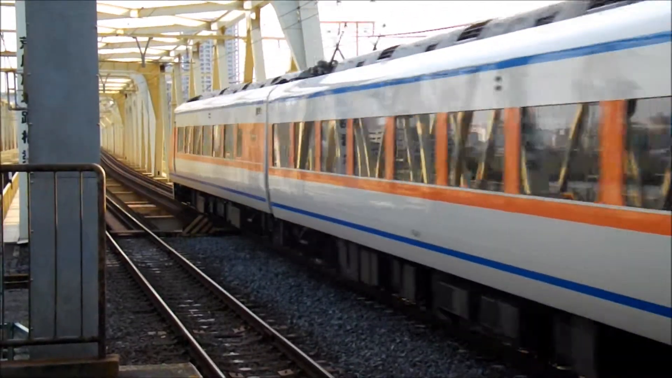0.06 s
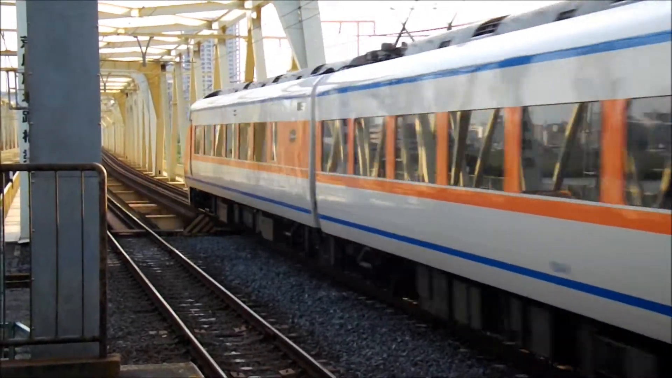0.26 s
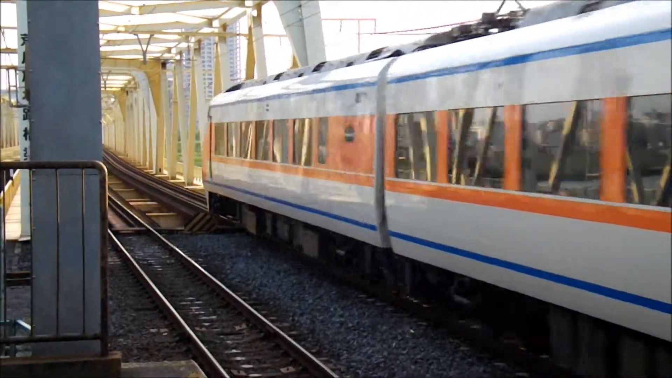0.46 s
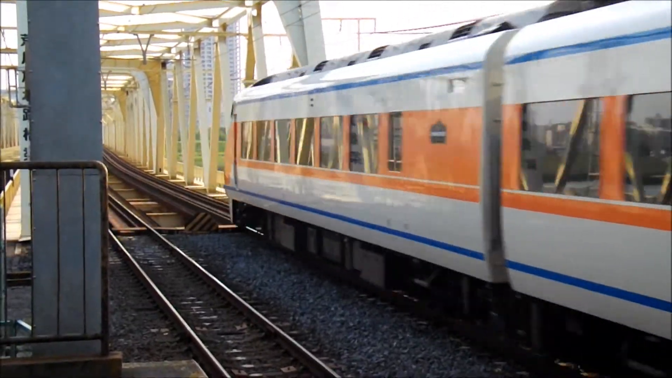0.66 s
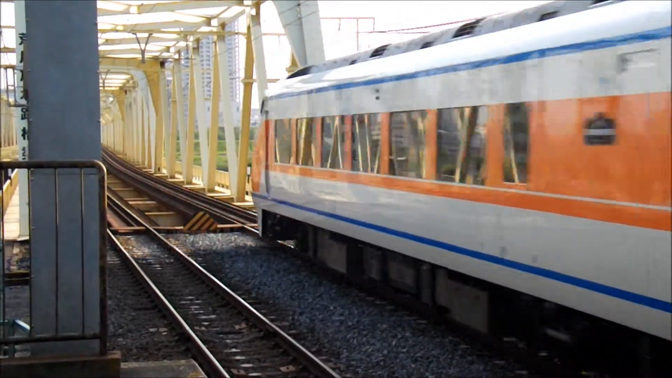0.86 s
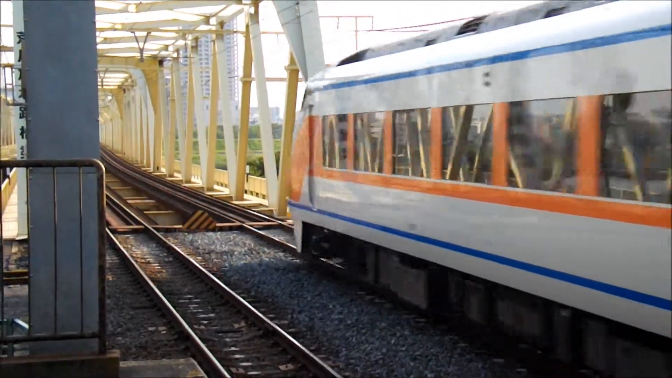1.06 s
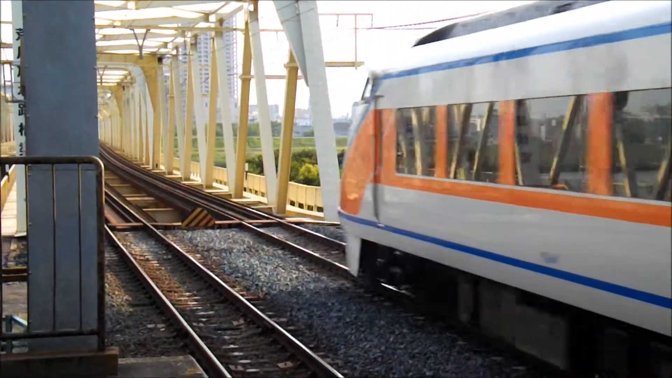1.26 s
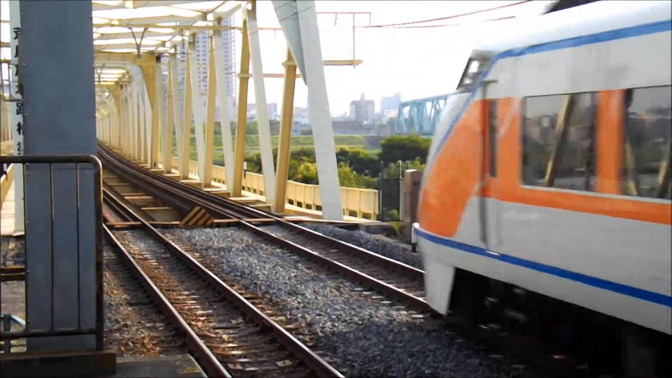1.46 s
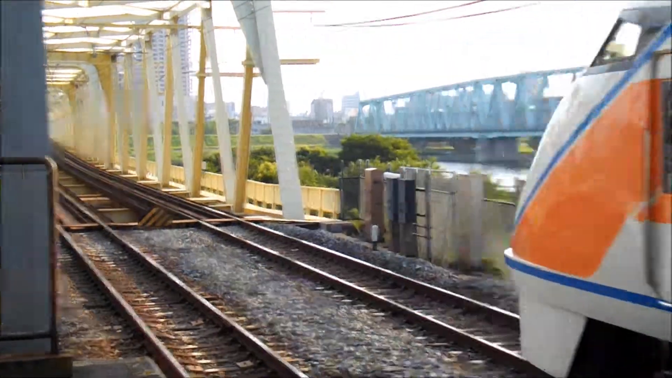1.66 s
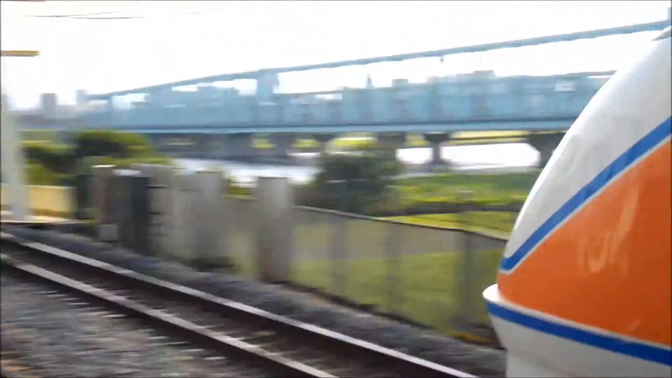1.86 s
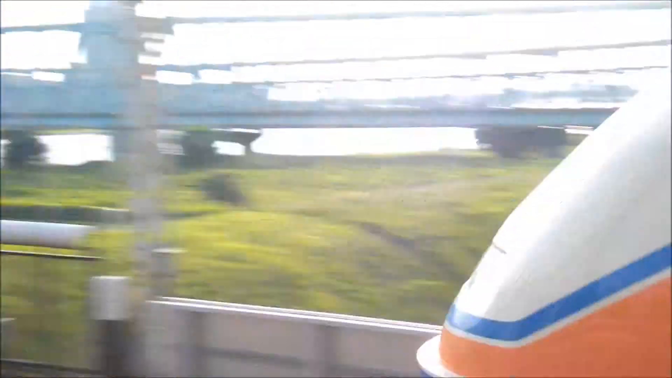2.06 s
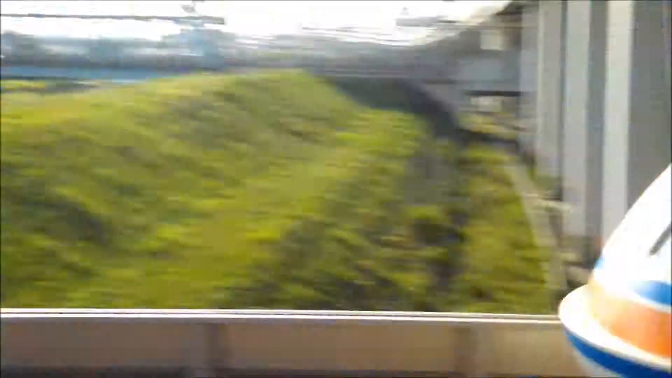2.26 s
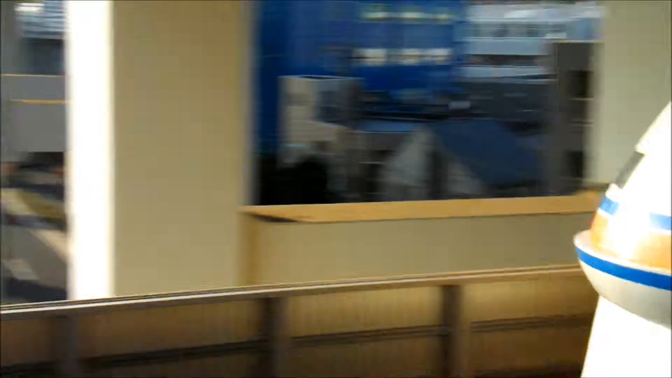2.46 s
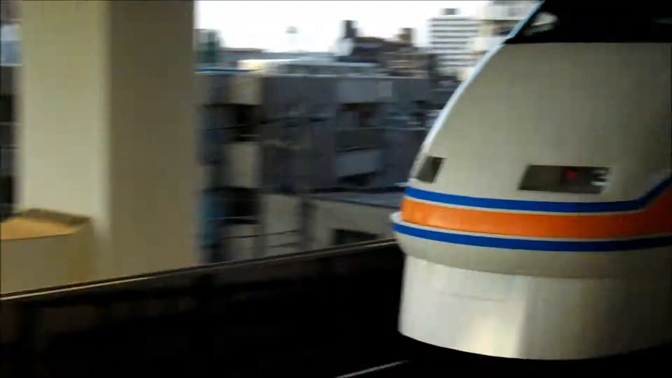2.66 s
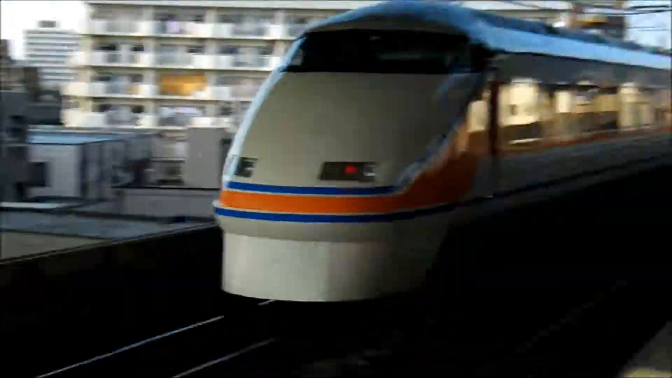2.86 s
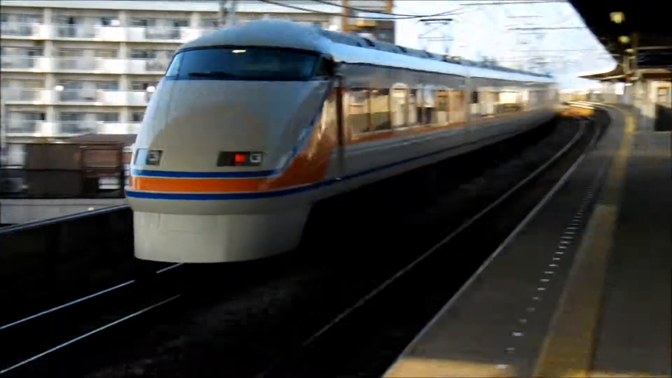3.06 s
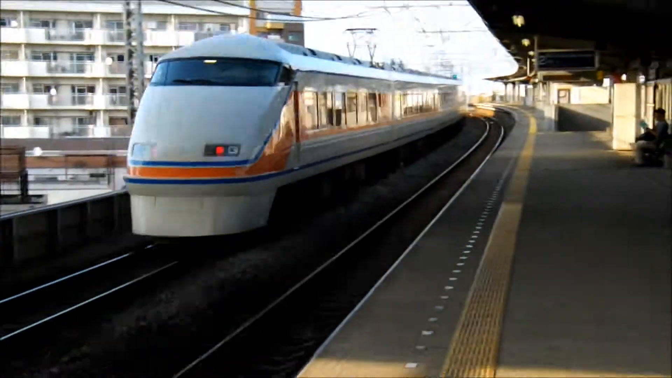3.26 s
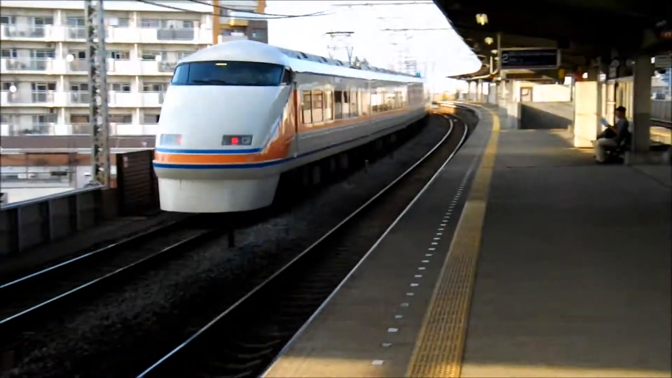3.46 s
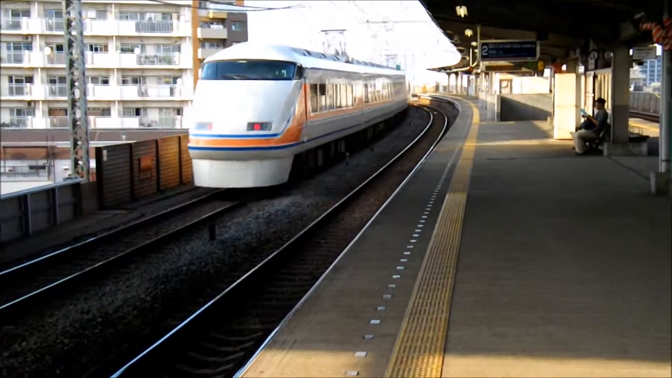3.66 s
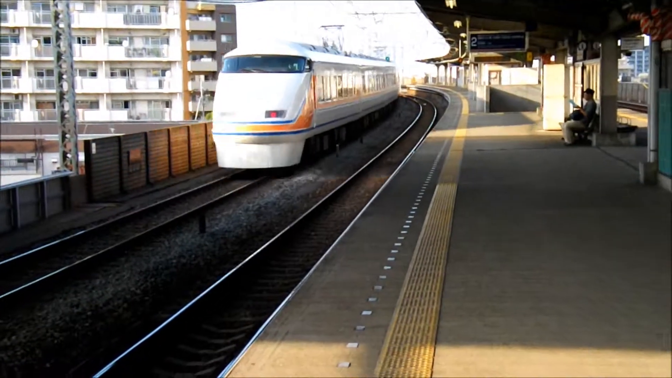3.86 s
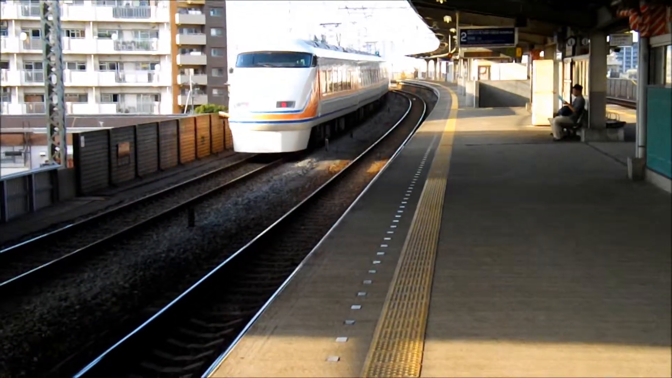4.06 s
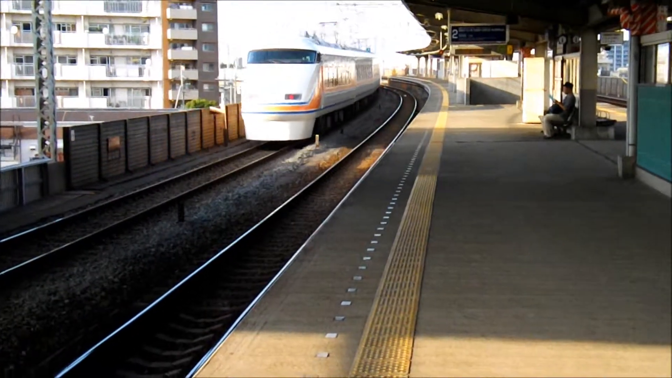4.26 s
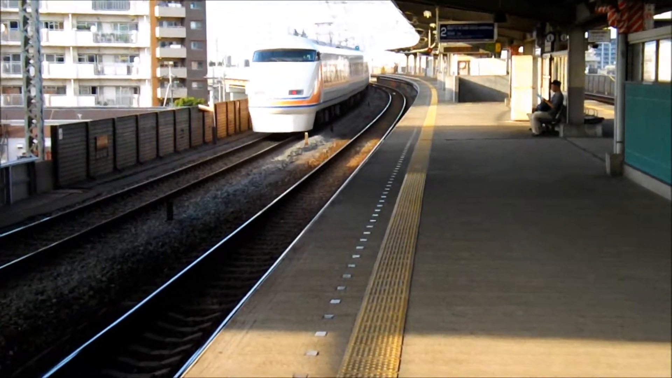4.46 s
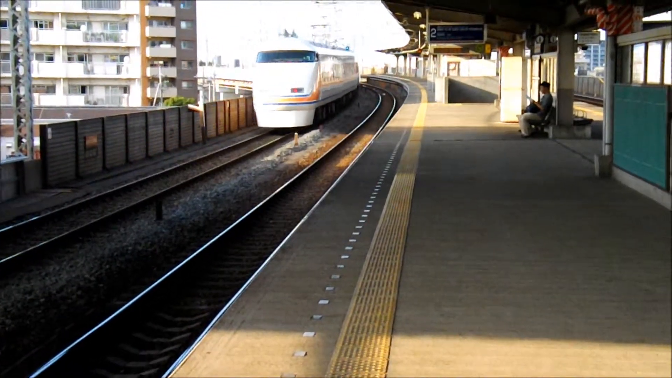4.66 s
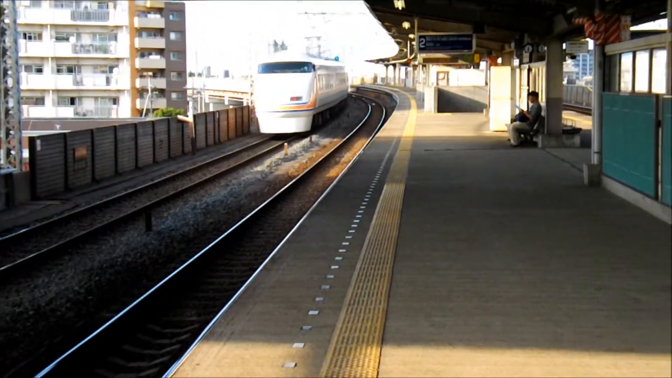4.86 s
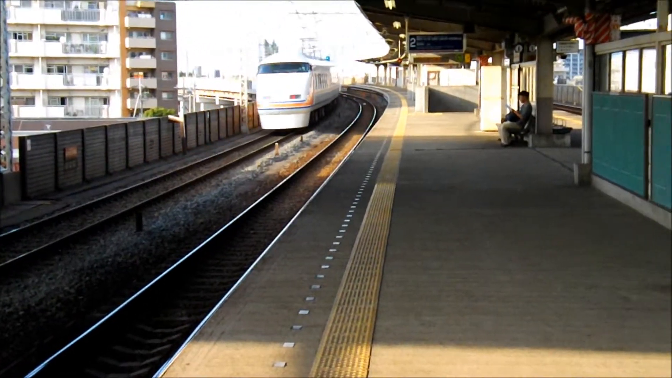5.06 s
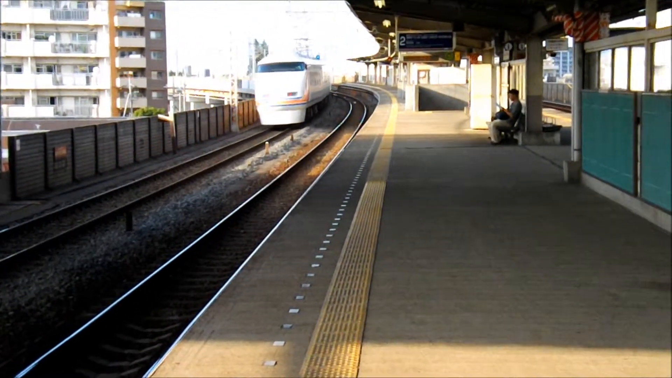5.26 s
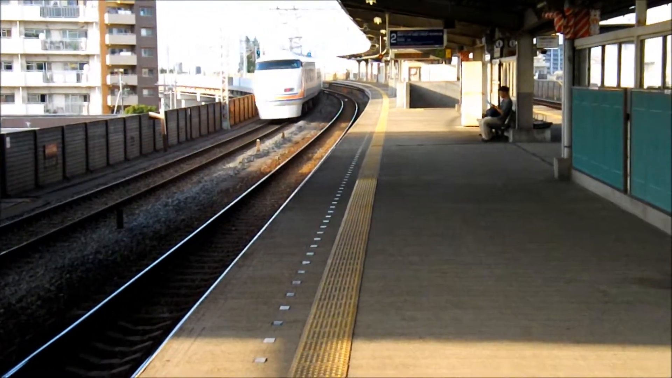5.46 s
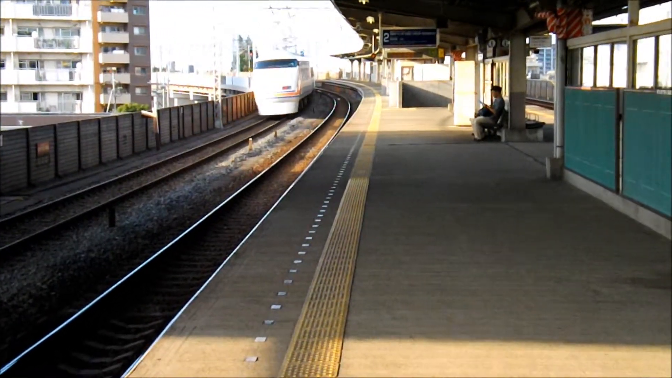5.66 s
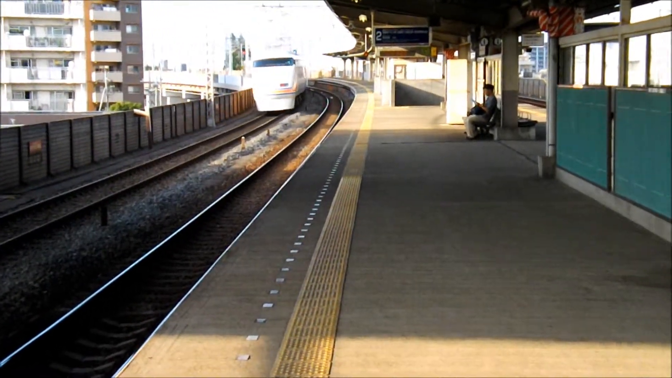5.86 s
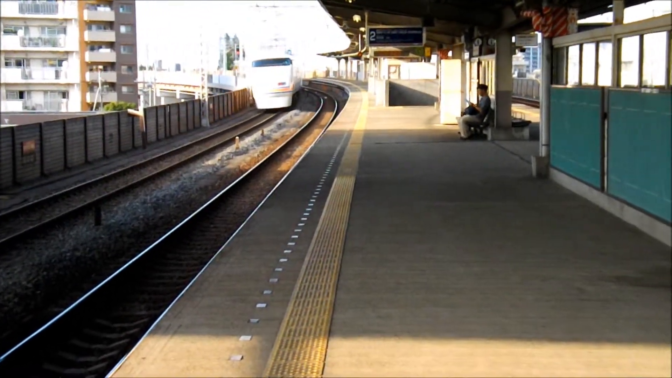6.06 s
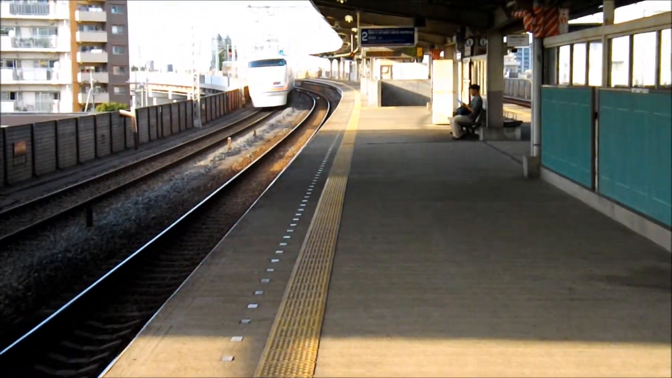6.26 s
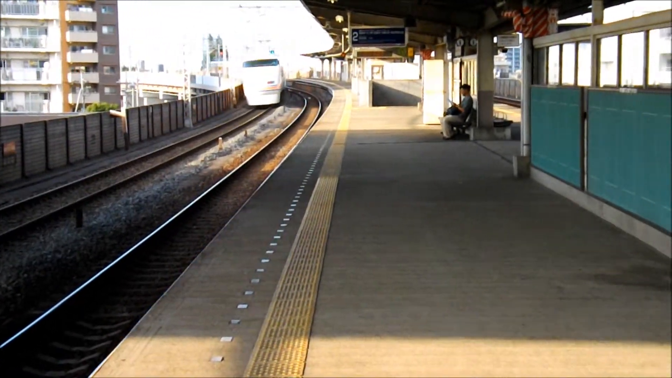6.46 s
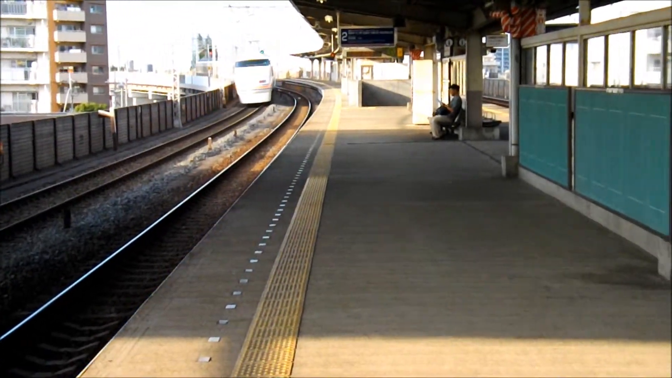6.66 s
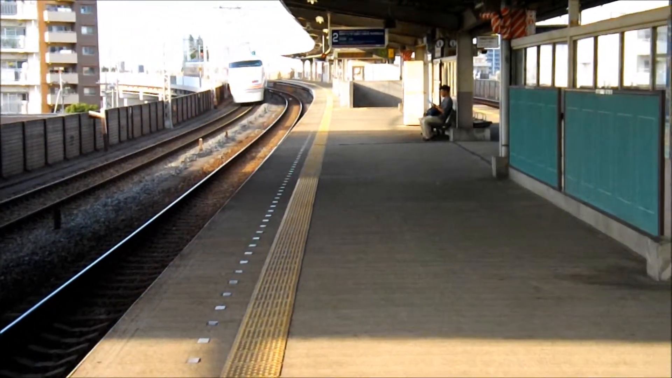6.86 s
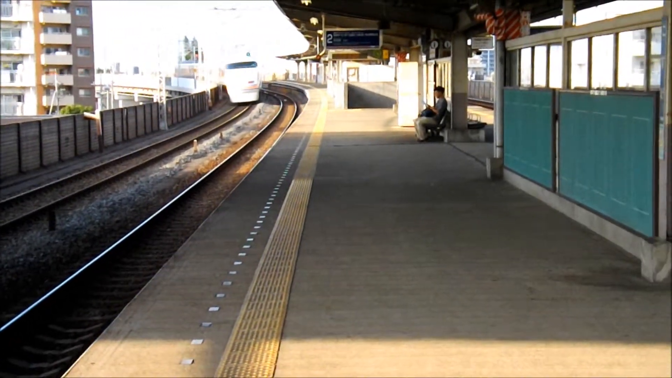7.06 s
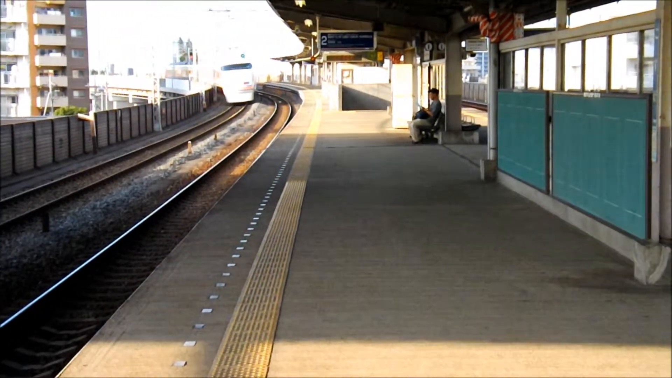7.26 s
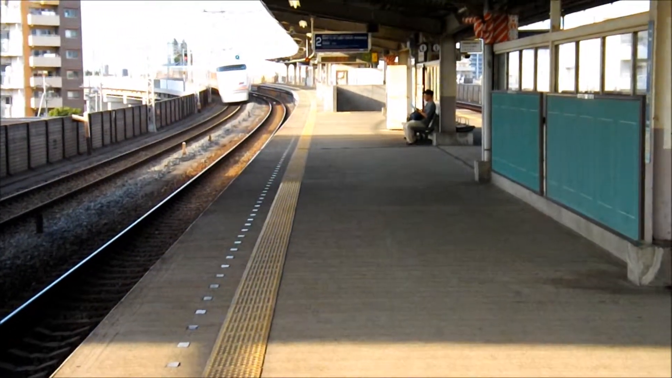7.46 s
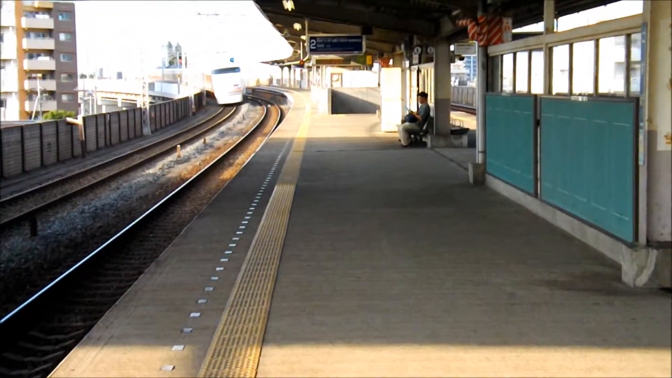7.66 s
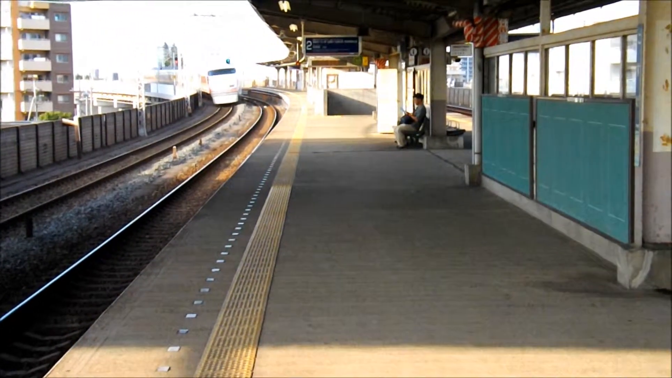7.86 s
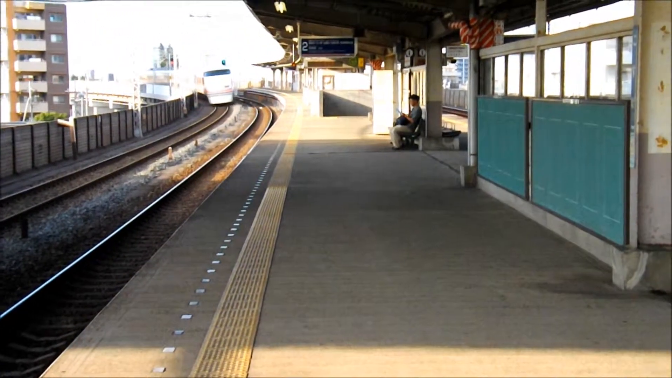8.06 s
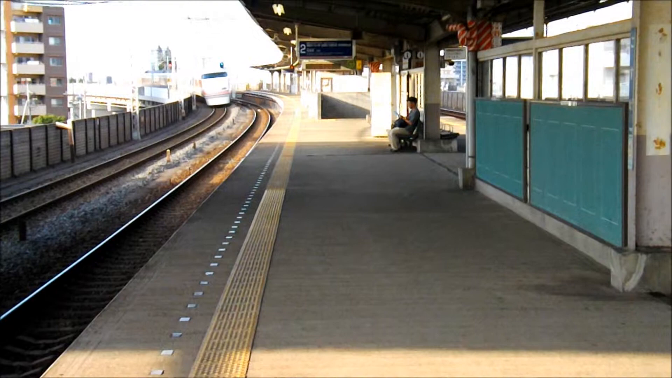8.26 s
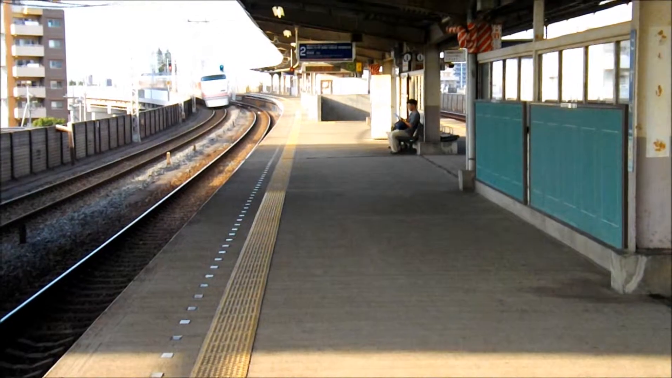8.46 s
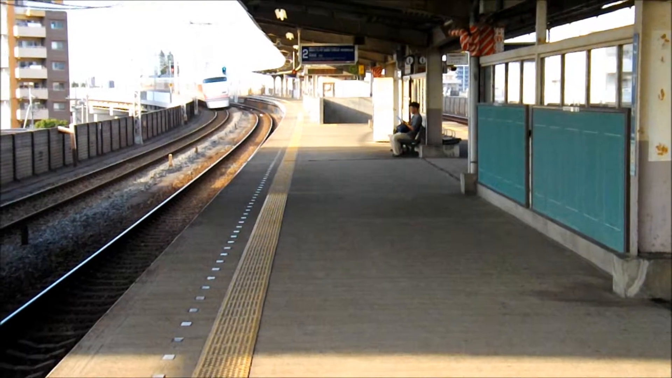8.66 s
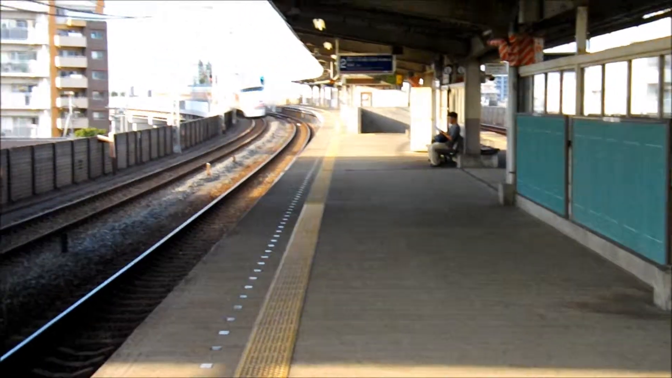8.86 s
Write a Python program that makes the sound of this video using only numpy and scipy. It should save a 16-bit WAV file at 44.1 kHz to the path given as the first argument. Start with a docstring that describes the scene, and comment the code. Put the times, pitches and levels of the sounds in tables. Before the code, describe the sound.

Loud rattling rush of a fast train close by, with wavering motor whine and brief wheel squeals, fading to thin rail hiss and buffeting air.

```python
"""A station platform beside a steel truss bridge: an electric express rushes past and recedes.
Bridge and track roar and wheels hiss on rails (shaped noise), while their flanges sing in brief narrow bands.
The drive whines in wavering tones, and the rails go on hissing behind the train.
Its slipstream then buffets the microphone in short, fluttering puffs of noise; a town murmurs throughout."""
import sys
import numpy as np
from scipy import signal
from scipy.fft import rfft, irfft, next_fast_len
from scipy.io import wavfile
from scipy.ndimage import uniform_filter1d, map_coordinates

SR = 44100
rng = np.random.default_rng(int(sys.argv[2]) if len(sys.argv) > 2 else 0)


def master(y):
    """Save y as 16-bit WAV."""
    cut = np.clip(np.atleast_2d(y).T, -1, 1)
    pcm = np.round(cut * 32767)  # scale
    wavfile.write(sys.argv[1], SR, pcm.astype(np.int16))


N = 393372

# The pass: constant distance until the last wheels leave, then a straight retreat
TRACK_M, SPEED_M_PER_S, LAST_WHEELS_S = 12, 20, 2.12

# Rolling sounds, before each layer's trim: [start level/dB, sag alongside/(dB/s),
# loss per tenfold distance/dB, level that the rails carry from afar/dB]
ROAR_FADE = (-23.5, 0.68, 29, -43.5)
RUSH_FADE = (-21, 1.04, 29, -49)
HISS_FADE = (-24, 1.2, 18.5, -48.5)

# Swells as wheels bear harder on the rail: [middle t/s, half length/s, hiss level before trim/dB]
WHEEL_SWELLS = [(0, 0.13, -22.5), (.5, 0.2, -24.5), (.78, 0.056, -26.5), (1.0, 0.07, -25),
                (1.89, 0.046, -19), (2.5, 0.027, -25), (2.75, 0.11, -22.5), (4.1, 0.071, -40),
                (4.8, 0.041, -39.5), (5.85, 0.036, -45), (7.74, .035, -41), (8.38, 0.1, -41),
                (8.62, 0.028, -39.5), (8.88, 0.13, -40.5)]
SWELL_RUSH_DB = -5.5  # a swell's gain in the rush relative to the hiss, before their trims

# Relative spectra of the rolling noise: [f/Hz, level/dB]
ROAR_SPECTRUM = [(25, -37), (60, -22), (110, -19), (150, -12.5), (185, -7), (270, -3), (370, -2), (480, 1),
                 (620, 3), (900, -1), (1300, -6), (2000, -8), (4000, -58)]
RUSH_SPECTRUM = [(400, -47), (900, -4.5), (1400, -5), (2000, -2), (3000, 0), (3900, 2), (4700, -0.5),
                 (5400, -7.5), (6200, -15), (7000, -16.5), (8200, -21.5), (10000, -32.5), (12000, -45.5),
                 (16000, -75)]
RAIL_HISS_SPECTRUM = [(2500, -31), (3600, -23), (4150, 0.5), (4900, 1.5), (5250, -1.5), (5600, -10),
                      (6100, -22), (7500, -22), (11000, -56)]

# Resonances of girders and rails: [f/Hz, width/Hz, lift/dB]
TRACK_MODES = [(194, 40, 4.5), (356, 80, 3.5), (795, 110, 3.5), (1102, 130, 3.5)]
RAIL_MODES = [(1600, 91, 0.76), (2330, 330, 2.1), (3200, 110, 0.33)]

# Whine of the drive: [t/s, central f/Hz, level before the line levels/dB]
DRIVE_COURSE = [(0, 823.7, -36), (1, 794, -42), (1.8, 765, -36), (2.6, 742, -37), (3.2, 731, -42),
                (3.8, 716, -46.5), (4.6, 713, -43), (5, 713, -55), (8.92, 712, -57)]
# Lines of the whine: [multiple of the central f, relative level/dB]
DRIVE_LINES = [(1, -1.5), (1.572, -8), (2.061, -10.5), (3.2, -7)]
# Depth of pitch wander as a share of f: always present, and added alongside
FAR_SPREAD, NEAR_SPREAD = 0.003, 0.046

# Relative spectrum of the town: [f/Hz, level/dB]
TOWN_SPECTRUM = [(25, -13), (60, 1.5), (110, 4.5), (250, 1), (500, -9), (850, 2), (1500, 0), (2250, -4.5),
                 (3000, -26), (7000, -36)]

# Wheels scraping and ringing: [middle t/s, half length/s, f/Hz, width/Hz, level/dB]
FLANGE_NOTES = [(0.028, 0.039, 5290, 220, -23), (.44, .025, 3900, 400, -21),
                (0.756, 0.055, 6800, 1600, -30.5), (0.98, 0.013, 1680, 54, -23.5),
                (1.004, 0.03, 4100, 200, -22.5), (1.272, 0.037, 765, 50, -22),
                (1.862, 0.065, 5200, 150, -27), (2.608, 0.025, 5360, 340, -19), (3.35, 0.074, 617, 22, -41)]

# Brief dips of the train's level: [t/s, nominal depth/dB, recovery/s]
LEVEL_DIPS = [(.06, 7, .017), (.303, 6, 0.016), (.356, 8, .012), (.676, 6.5, .02), (.709, 7, 0.0081),
              (.742, 5.5, 0.03), (.882, 5.5, 0.025), (.941, 9, 0.02), (1.128, 12.5, .027),
              (1.176, 3.5, 0.048), (1.42, 5.5, 0.013), (1.761, 7, 0.0092), (1.955, 3.5, 0.024),
              (2.039, 8.5, 0.0091), (2.307, 7, 0.023), (2.398, 6, 0.013), (2.64, 4, 0.02)]
DIP_FALL_S = 0.003

# The slipstream arrives behind the train and leaves a light breeze (level before trim)
WAKE_S, WAKE_RISE_S, BREEZE_DB = 3.7, 0.2, -52
# Gusts in it: [middle t/s, half length/s, level before trim/dB]
GUSTS = [(3.96, 0.18, -33.5), (4.24, 0.11, -31), (4.56, 0.14, -37.5), (4.86, 0.036, -36),
         (5.23, 0.023, -42), (5.53, 0.097, -40), (5.82, .08, -39), (6.15, 0.15, -35.5),
         (6.54, 0.054, -39.5), (7.0, 0.1, -40.5), (7.6, 0.28, -39), (7.94, .1, -41), (8.37, 0.11, -35.5),
         (8.76, 0.11, -43.5)]
# Strongest single puffs of air: [t/s, level before a common cut/dB]
PUFFS = [(3.902, -16), (3.932, -19), (4.069, -17), (4.18, -13.5), (4.223, -12.5), (4.255, -12),
         (4.266, -13), (4.298, -17), (4.323, -17), (4.788, -20.5), (4.875, -23), (5.451, -17), (5.488, -20),
         (5.514, -22), (5.787, -19), (5.89, -21), (6.002, -21.5), (6.141, -21.5), (6.214, -22.5),
         (6.269, -20.5), (6.999, -25), (7.059, -26.5), (7.319, -26), (7.458, -22.5), (7.526, -23.5),
         (8.244, -21), (8.443, -20)]
PUFF_RISE_S, PUFF_LENGTH_S = 0.0014, 0.013

# Relative spectra of the moving air: [f/Hz, level/dB]
BUFFET_SPECTRUM = [(25, -27), (60, -16), (110, -3.5), (220, -0.5), (380, -0.5), (650, -8.5), (900, -18),
                   (1300, -23), (2500, -34), (14000, -68)]
PUFF_SPECTRUM = [(40, -26), (120, -15.5), (300, 2), (600, 0), (850, -6), (1300, -20), (2500, -29),
                 (14000, -62)]

# Relative spectrum of the electronics: [f/Hz, level/dB]
MIC_HISS_SPECTRUM = [(30, 10), (5000, -12), (9000, 4.5), (13000, 2.5), (16000, -1.5)]
TOP_HZ = 15750  # nothing passes from here up


def amp(db):
    """Logarithmic level: decibels become an amplitude ratio."""
    return 10 ** (np.asarray(db) / 20)


def unit(x):
    """Normalisation: scale to rms 1."""
    return x / np.sqrt(np.mean(x ** 2) + 1e-20)


def clock():
    """Sampling: the time of each sample in seconds."""
    return np.arange(N) / SR


def curves(rows):
    """Linear interpolation: one value per sample for each column after the time."""
    s, *columns = np.transpose(rows)
    return [np.interp(clock(), s, column) for column in columns]


def wobble(rate):
    """Band-limited fluctuation: a smooth random curve with rate knots a second."""
    knots = rng.standard_normal(int(N * rate / SR) + 4)
    return map_coordinates(knots, [clock() * rate])


def filtered(x, response):
    """Linear filtering: multiply the spectrum of x by a response of frequency."""
    n = x.shape[-1]
    padded = next_fast_len(n + SR // 10)
    spectrum = rfft(x, padded) * response(np.fft.rfftfreq(padded, 1 / SR))
    return irfft(spectrum, padded)[..., :n]


def coloured(x, spectrum, modes=()):
    """Spectral shaping with resonance: weight x by a spectrum and modal humps, at rms 1."""
    f, db = np.transpose(spectrum)

    def response(hz):
        level_db = np.interp(np.log(hz + 1), np.log(f), db)
        for centre, width, lift in modes:
            level_db = level_db + lift / (1 + (2 * (hz - centre) / width) ** 2)
        return amp(level_db)

    return unit(filtered(x, response))


def smoothed_grid(shape, bins, frames):
    """Local averaging: a random grid smoothed over frequency and time, at rms 1."""
    grid = uniform_filter1d(rng.standard_normal(shape), size=bins, axis=0)
    return unit(uniform_filter1d(grid, size=frames, axis=1))


def patchy(patchy_db, surge_db):
    """Non-stationary noise: narrow bands flicker, broad ones surge, as wheel after wheel takes the lead."""
    z = signal.stft(rng.standard_normal(N), nperseg=1024)[2]
    narrow = smoothed_grid(z.shape, bins=3, frames=10)
    broad = smoothed_grid(z.shape, bins=22, frames=5)
    gain = amp(patchy_db * narrow + surge_db * broad)
    return signal.istft(z * gain, nperseg=1024)[1][:N]


def distance():
    """Pythagorean geometry: metres to the nearest wheels."""
    along_m = SPEED_M_PER_S * np.maximum(clock() - LAST_WHEELS_S, 0)
    return np.hypot(TRACK_M, along_m)


def passing(start_db, sag_db_per_s, loss_db, far_db):
    """Spreading loss: a level nearly held alongside, then falling to what the rails carry."""
    sag_db = sag_db_per_s * np.minimum(clock(), LAST_WHEELS_S)
    direct_db = start_db - sag_db - loss_db * np.log10(distance() / TRACK_M)
    return 20 * np.log10(np.hypot(amp(direct_db), amp(far_db)))


def swelling(rows):
    """Power addition: joint gain of bell-shaped swells."""
    t = clock()
    power = sum(amp(db) ** 2 * np.exp(-((t - s) / half) ** 2) for s, half, db in rows)
    return np.sqrt(power)


def track():
    """Structure-borne sound: wheels shake girders and sleepers into a rattling roar."""
    level_db = passing(*ROAR_FADE)
    rattle_db = 0.69 * wobble(14) + 0.51 * wobble(70)
    noise = patchy(patchy_db=1.03, surge_db=0.6)
    return amp(level_db + rattle_db) * coloured(noise, ROAR_SPECTRUM, TRACK_MODES)


def wheels():
    """Roughness excitation: steel on steel gives a broad rush and a high hiss that the rails carry far."""
    swell = swelling(WHEEL_SWELLS)
    rush_gain = np.hypot(amp(passing(*RUSH_FADE)), amp(SWELL_RUSH_DB) * swell)
    hiss_gain = np.hypot(amp(passing(*HISS_FADE)), swell)
    # distance evens out the roughness of single wheels
    nearness = TRACK_M / distance()
    roughness_db = (0.19 + 0.95 * nearness) * wobble(40)
    rush_noise = patchy(patchy_db=1.42, surge_db=0.6)
    rush = rush_gain * amp(2.5) * coloured(rush_noise, RUSH_SPECTRUM, RAIL_MODES)
    hiss_noise = patchy(patchy_db=1.5, surge_db=0.43)
    hiss_trim = amp(-2.5 + 0.66 * wobble(20))
    hiss = hiss_gain * hiss_trim * coloured(hiss_noise, RAIL_HISS_SPECTRUM)
    return amp(roughness_db) * (rush + hiss)


def whine():
    """Frequency modulation and beating: motors and gears sing; unlike Doppler shifts blur the near cars."""
    pitch_hz, level_db = curves(DRIVE_COURSE)
    spread = FAR_SPREAD + NEAR_SPREAD * (TRACK_M / distance()) ** 2
    lines = np.zeros(N)
    for multiple, db in DRIVE_LINES:
        line_hz = multiple * pitch_hz * (1 + spread * wobble(90))
        phase = 2 * np.pi * np.cumsum(line_hz) / SR
        # a random complex amplitude makes the line beat
        beating = 0.5 + 0.5 * (wobble(16) + 1j * wobble(16))
        lines += amp(db) * unit(np.real(beating * np.exp(1j * phase)))
    return amp(level_db) * lines


def surroundings():
    """Stationary noise: the town murmurs steadily round the station."""
    return amp(-46.5) * coloured(rng.standard_normal(N), TOWN_SPECTRUM)


def flanges():
    """Frictional excitation of a resonance: rail contact rubs one wheel mode into a short, rough note."""
    notes = np.zeros(N)
    for s, half, hz, width_hz, db in FLANGE_NOTES:
        resonance = lambda f: 1 / (1 + (2 * (f - hz) / width_hz) ** 2)
        note = unit(filtered(rng.standard_normal(N), resonance))
        envelope = np.exp(-0.5 * ((clock() - s) / half) ** 2)
        notes += amp(db) * envelope * note
    return notes


def dips():
    """Amplitude modulation: a gain that drops within milliseconds and soon comes back."""
    drop_db = np.zeros(N)
    for s, depth_db, recovery in LEVEL_DIPS:
        age = np.maximum(clock() - s, 0)
        fall = np.minimum(age / DIP_FALL_S, 1)
        drop_db += depth_db * fall * np.exp(-(age / recovery) ** 2)
    return amp(-drop_db)


def slipstream():
    """Turbulent pressure: eddies flutter on the microphone in gusts; the strongest land as puffs."""
    breeze = amp(BREEZE_DB) * np.clip((clock() - WAKE_S) / WAKE_RISE_S, 0, 1)
    gust_gain = np.hypot(breeze, swelling(GUSTS))
    flutter = unit(amp(3.5 * wobble(110) + wobble(22)))
    buffet = coloured(flutter * rng.standard_normal(N), BUFFET_SPECTRUM)
    air = gust_gain * amp(-1.5) * buffet
    # each puff starts abruptly and is spent within a few cycles
    t = np.arange(-SR // 50, SR // 10) / SR
    envelope = np.clip(t / PUFF_RISE_S, 0, 1) * np.exp(-(t / PUFF_LENGTH_S) ** 2)
    for s, db in PUFFS:
        puff = amp(db - 21.0) * coloured(envelope * rng.standard_normal(len(t)), PUFF_SPECTRUM)
        start = round((s + t[0]) * SR)
        air[start:start + len(t)] += puff[:N - start]
    return air


def scene():
    """Superposition: train, wind and town add at one microphone, on two like channels."""
    train = (track() + wheels() + whine() + flanges()) * dips()
    mono = train + surroundings() + slipstream()
    return np.array([mono, mono])


def record(dry):
    """Electronic noise and band limiting: hiss partly unlike in each channel, treble lifted then cut."""
    shared = amp(-59.0) * coloured(rng.standard_normal(N), MIC_HISS_SPECTRUM)
    own = amp(-85) * coloured(rng.standard_normal((2, N)), MIC_HISS_SPECTRUM)
    lift = lambda hz: (hz < TOP_HZ) / np.cos(np.pi * np.minimum(hz, TOP_HZ) / SR)
    left, right = filtered(dry + shared + own, lift)
    late_left = np.pad(left, (1, 0))[:N]  # one sample late
    return np.array([late_left, right])


dry = scene()
out = record(dry)
master(out)
```